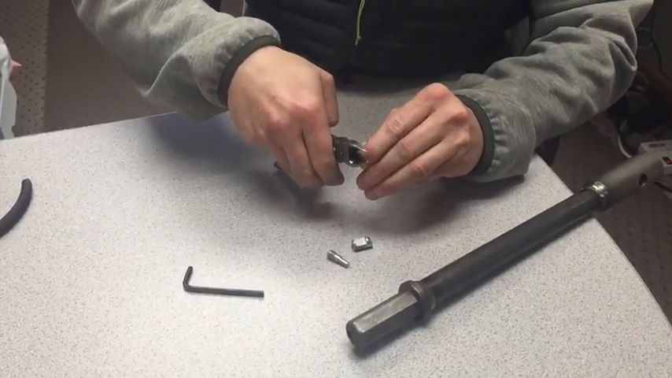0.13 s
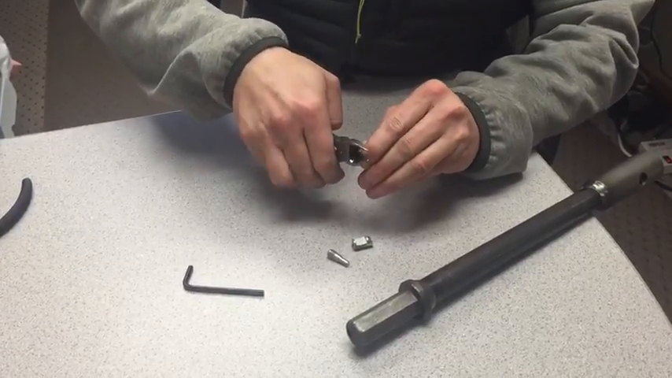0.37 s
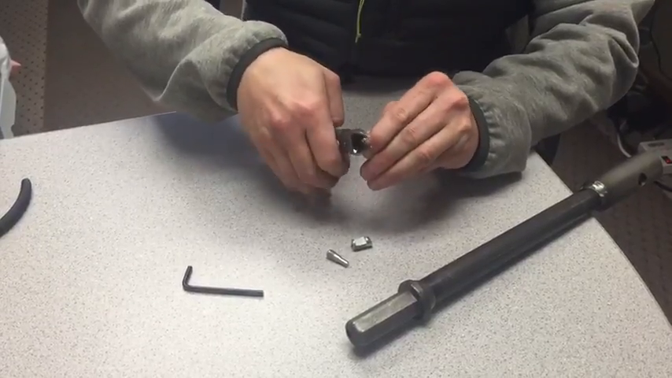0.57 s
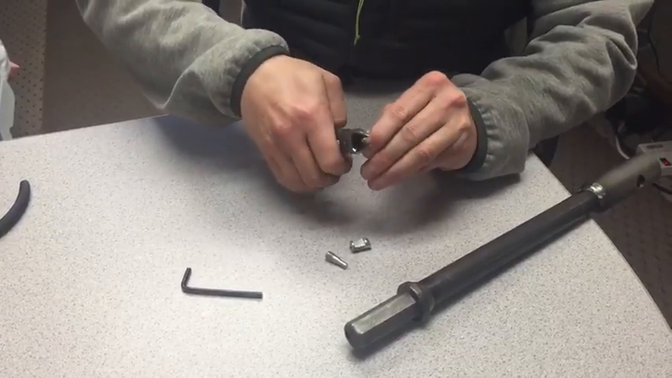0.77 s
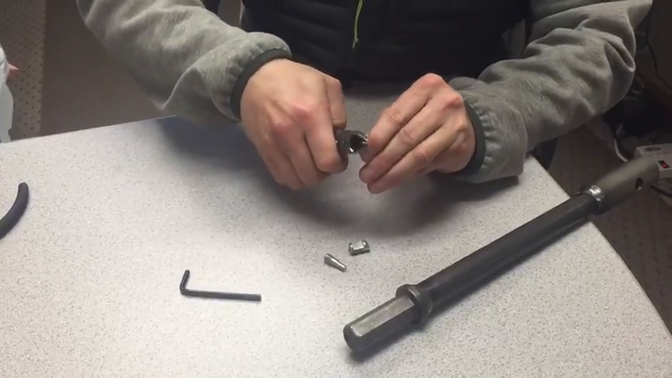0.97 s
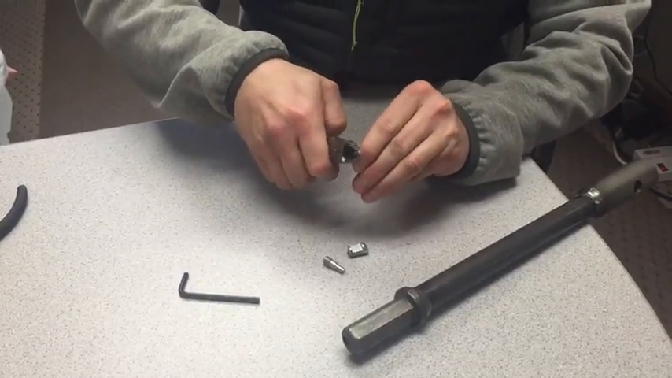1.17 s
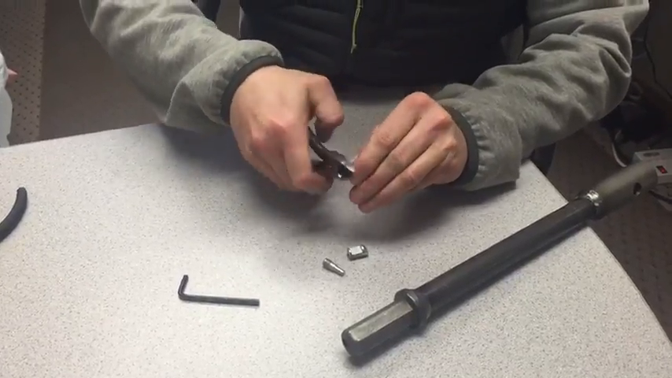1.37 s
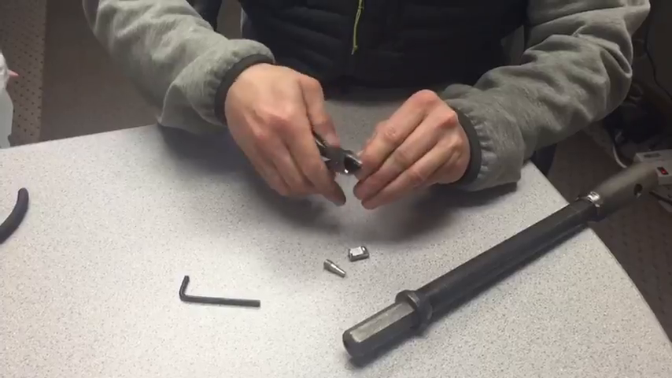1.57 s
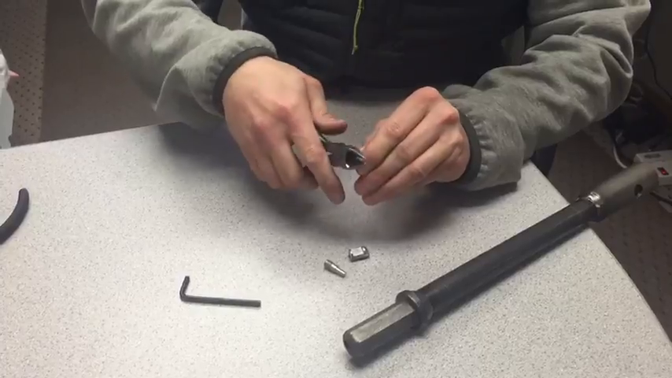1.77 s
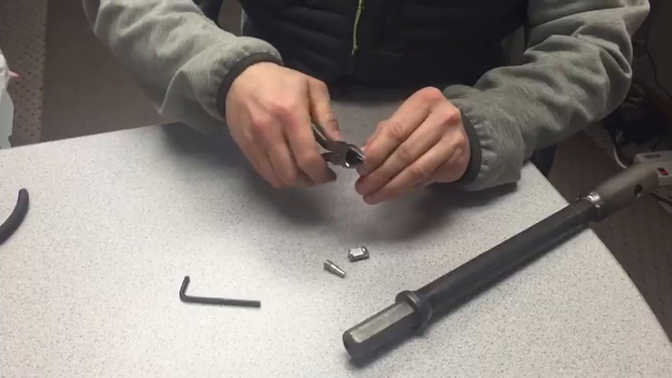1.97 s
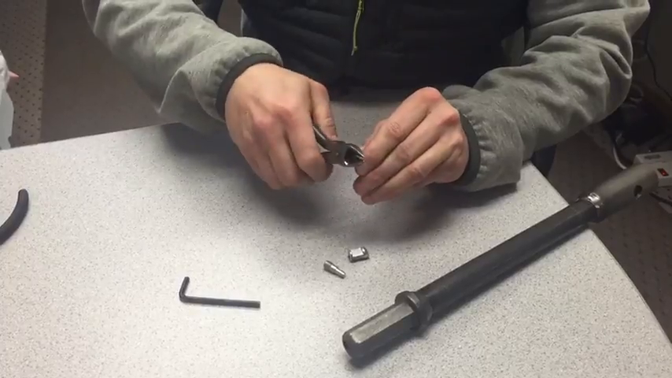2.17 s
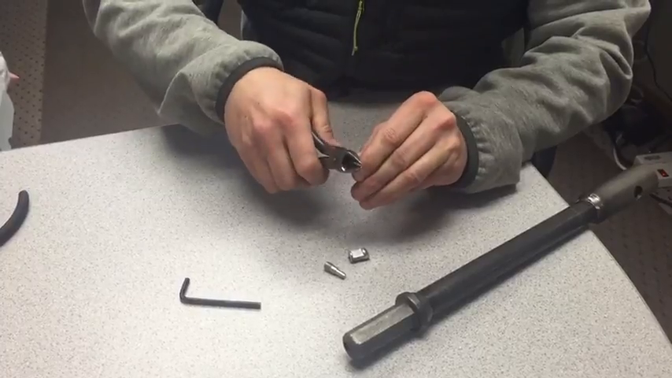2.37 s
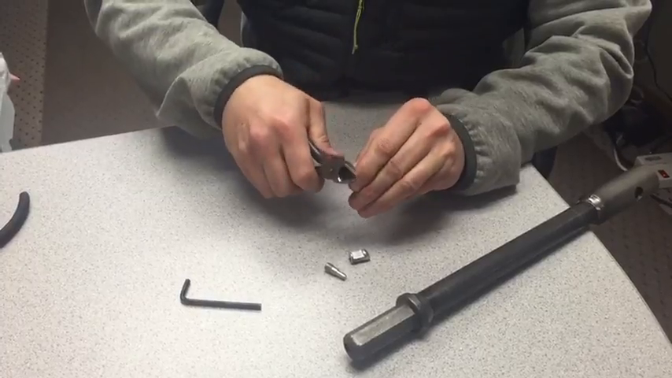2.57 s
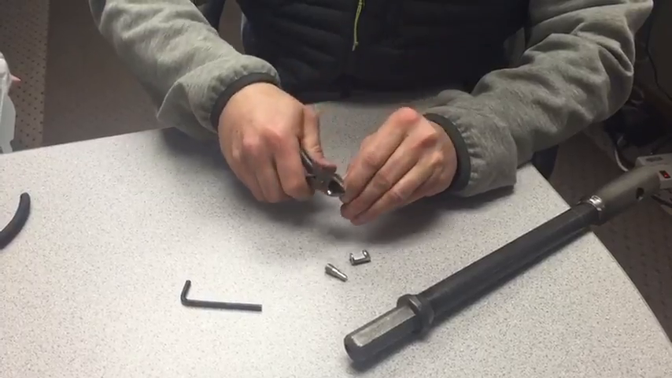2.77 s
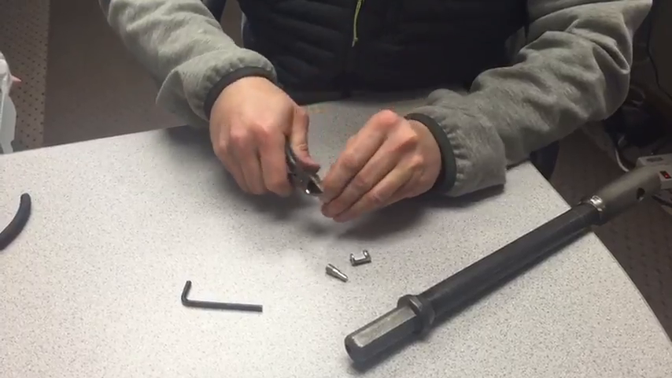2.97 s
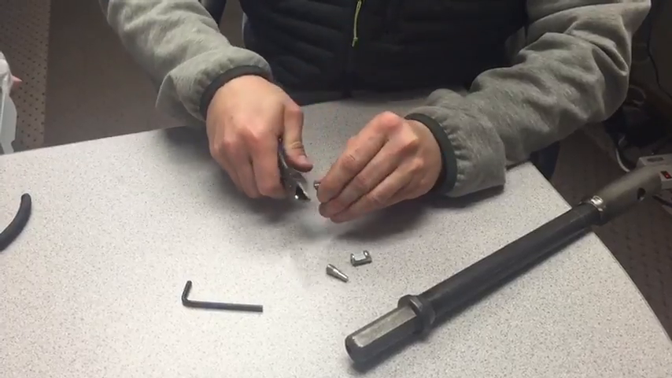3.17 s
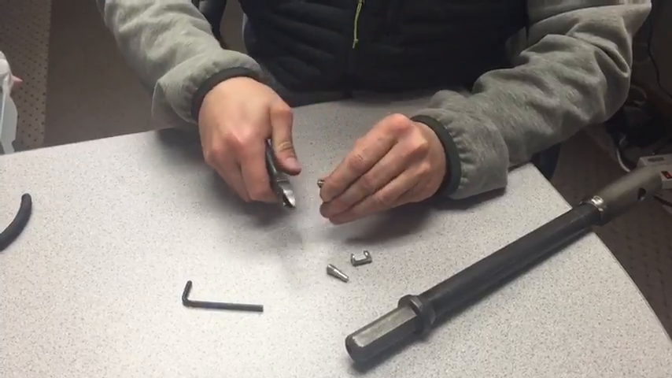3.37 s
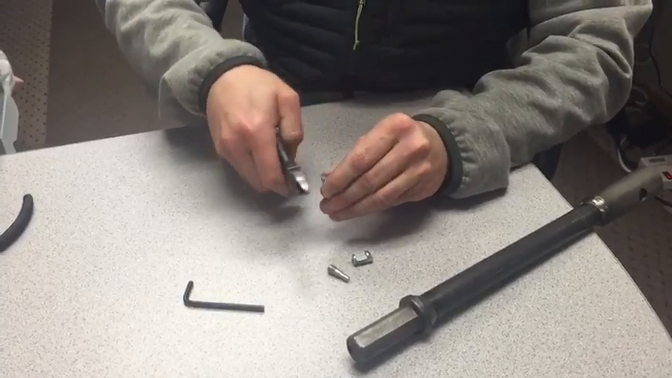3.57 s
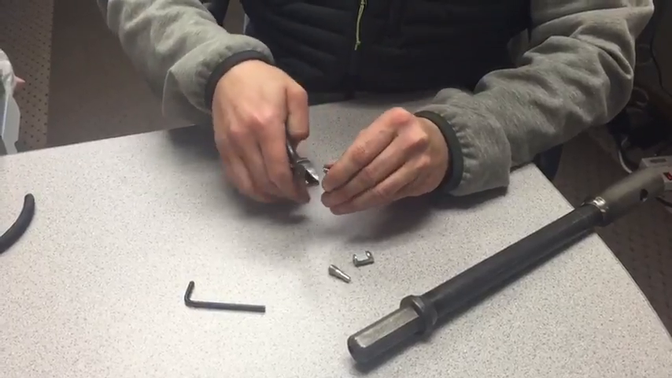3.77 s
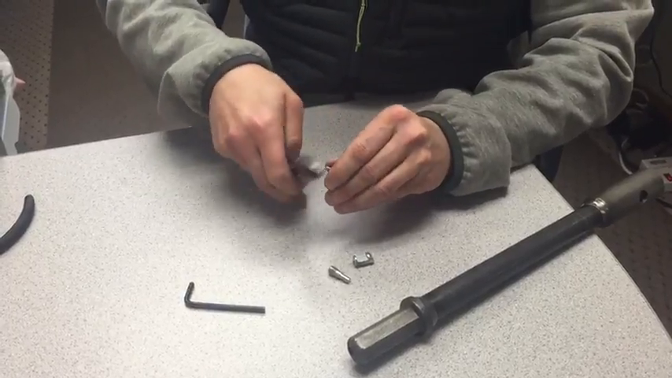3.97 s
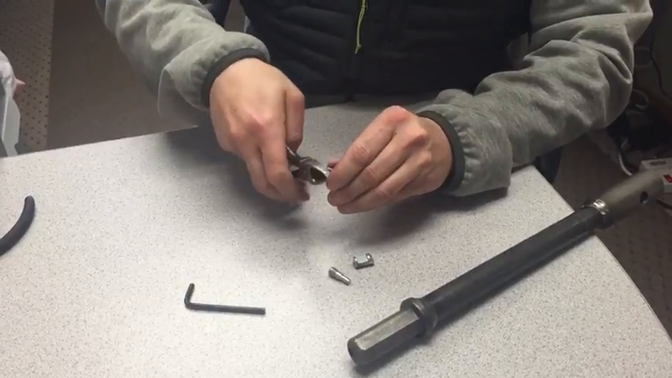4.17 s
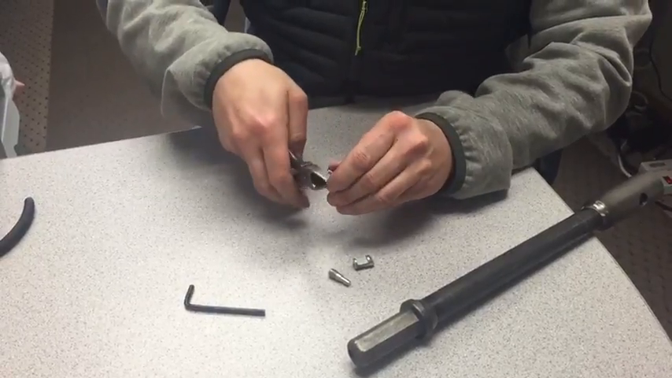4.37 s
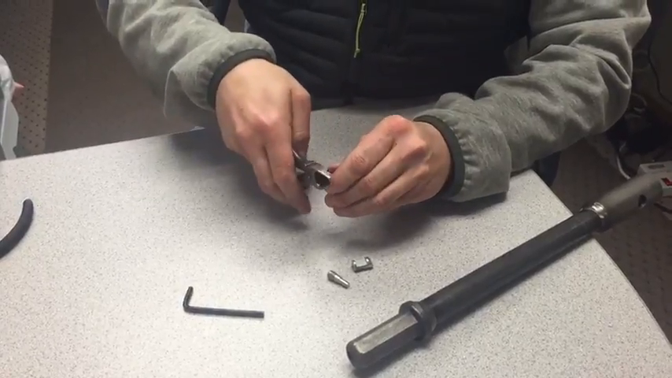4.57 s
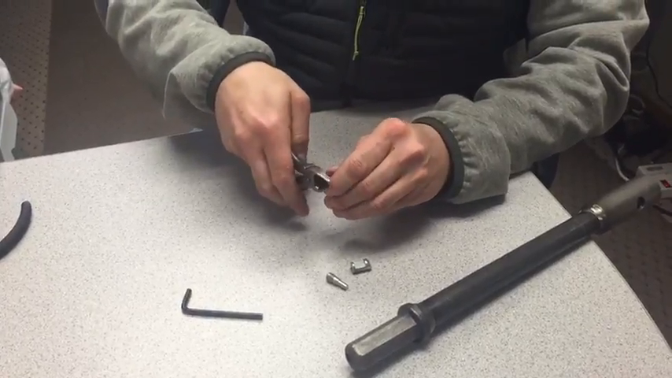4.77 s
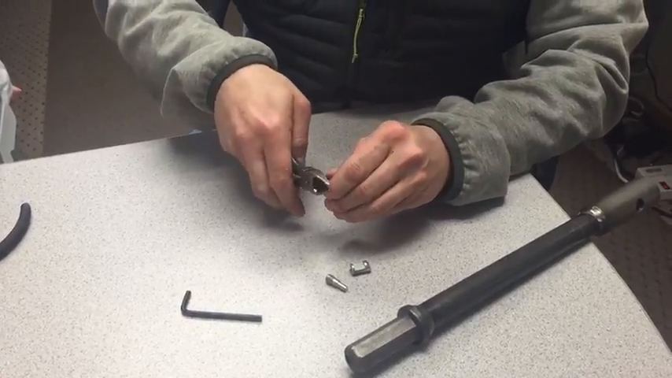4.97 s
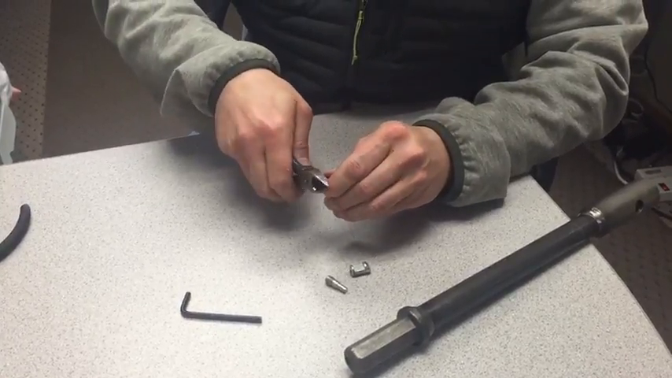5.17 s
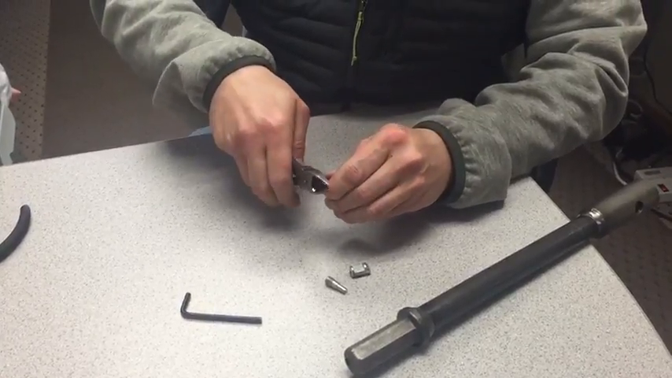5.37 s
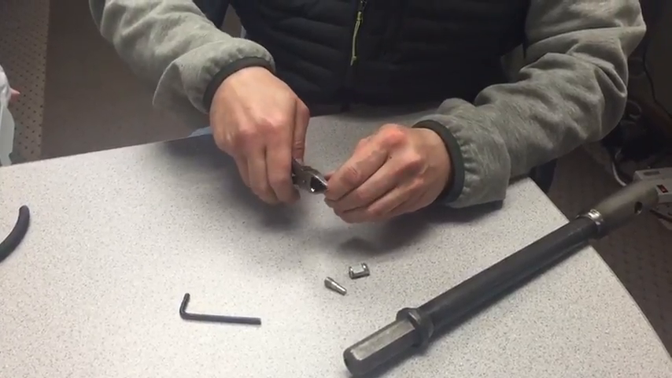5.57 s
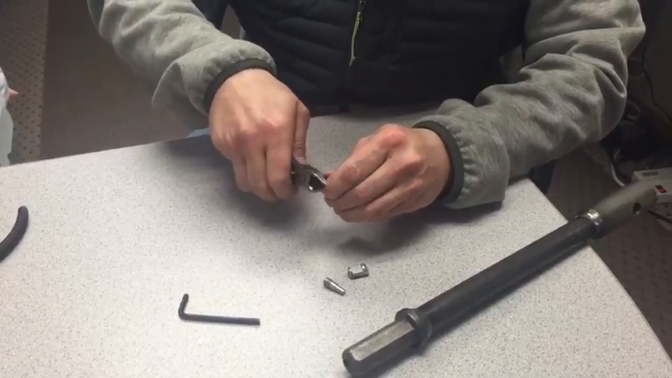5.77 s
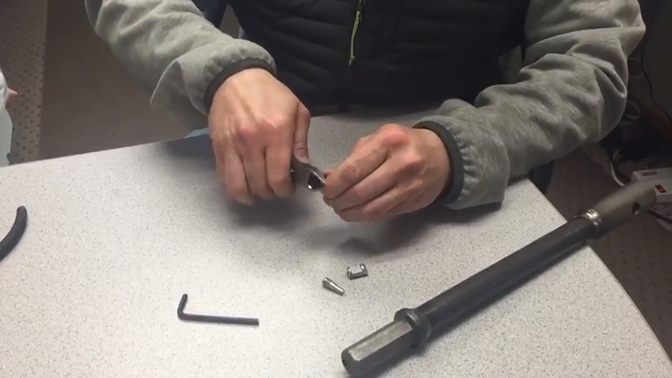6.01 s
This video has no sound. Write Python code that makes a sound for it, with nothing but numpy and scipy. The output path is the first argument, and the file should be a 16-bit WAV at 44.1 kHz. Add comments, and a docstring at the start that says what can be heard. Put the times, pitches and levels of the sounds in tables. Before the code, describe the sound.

Side cutters give a short, muted clack in the hand, and fingers rub briefly on the handles. After a pause, the jaws bite through a small steel spring with one loud, sharp snap, and the cut end lands faintly farther off. A tiny scrape, light metal ticks and a dry knock follow as the jaws touch the spring again. Heard close up at a table in a small, quietly humming room.

```python
"""A small, quietly humming room, where side cutters snip a small steel spring over a table.
The cutters clack as the hand takes a new grip, and fingers rub the handles. The jaws bite through
with one sharp snap that rings the steel and jolts the hands; the cut end flies off and lands far away.
As the cutters are set again, a jaw scrapes over the coils, then ticks and knocks on the spring."""
import sys
import numpy as np
from scipy import signal
from scipy.fft import rfft, irfft, next_fast_len
from scipy.io import wavfile
from scipy.ndimage import map_coordinates

SR = 44100
rng = np.random.default_rng(int(sys.argv[2]) if len(sys.argv) > 2 else 0)


def unload_wav(signal):
    """Save mono or channel-first audio to the path in sys.argv[1] as 16-bit WAV at rate SR, clipped to [-1, 1]."""
    wavfile.write(
        sys.argv[1],
        SR,
        np.round(np.clip(np.atleast_2d(signal).T, -1, 1) * 32767).astype(np.int16),
    )


N = 266408

# how long the room rings: frequency_hz, t60_s
ROOM_DECAY = [(100, 0.11), (600, 0.36), (2500, 0.23), (5000, 0.18), (9000, 0.21), (15000, 0.13)]
# bed of rumble and hiss: frequency_hz, density_db
AIR_COLOUR = [(13, -34.5), (22, -13), (53, -1.5), (95, -1.5), (118, -10.5), (179, -1.5), (205, -5.5),
              (223, -18), (294, -19.5), (356, -22.5), (387, -12.5), (420, -26.5), (482, -26.5),
              (2200, -34.5), (16000, -47.5)]
# hum of a distant motor: shaft_multiple, rms_db
MOTOR_HARMONICS = [(1, -66), (4, -68.5), (6, -83), (8, -80.5), (10, -85.5)]
# two more low tones in the room: pitch_hz, rms_db
DRONE_TONES = [(86.1, -71.5), (167, -66.5)]

# the cutters clack open: start_s, level_db
CLACK_HITS = [(0.5803, -26.5)]
# ring of the cutters, choked by the grip: pitch_hz, level_db, t60_s
GRIPPED_MODES = [(626, -10, 0.082), (723, -3, 0.033), (1060, -24, 0.044), (1760, -16, 0.029),
                 (2070, -6, 0.04), (2660, 5, 0.014), (2890, -2, 0.0064), (4280, -3, 0.012),
                 (5000, -8.5, 0.0095)]
# midrange attack of the clack: frequency_hz, density_db
CLACK_COLOUR = [(130, -4), (300, -5), (450, -9.5), (680, -1), (1050, 1), (1450, -15), (2100, -1.5),
                (2900, 1.5), (3700, -13.5), (4700, -17), (6200, -13.5), (8000, -22), (11000, -26),
                (16000, -46)]

# fingers slide on the handles: peak_s, level_db, width_s
RUB_STROKES = [(0.673, -49.5, 0.011), (0.749, -65.5, 0.017), (1.548, -73.5, 0.021), (4.215, -78, 0.12)]
# their soft friction: frequency_hz, density_db
RUB_COLOUR = [(200, -16), (470, -2.5), (640, 4.5), (850, 2), (1450, -20.5), (2150, -2), (2700, -11.5),
              (3800, -17), (4600, -17), (6000, -28), (16000, -50)]

# spring and jaw tips touch: start_s, level_db, ring_db, rebound_loss_db
TICK_HITS = [(2.929, -52.5, -8.5, 3), (4.0015, -39.5, 1, 6), (4.322, -65.5, -14, 14),
             (5.2228, -51.5, 4, 16)]
# thin ring of the tips: pitch_hz, level_db, t60_s
TIP_MODES = [(1470, -21.5, 0.018), (4138, -14, .022), (5360, -7.5, 0.02), (6370, -15, .016),
             (8807, -2, 0.021), (9310, -3, 0.015), (13194, -17, .012)]
# bright attack of a tick: frequency_hz, density_db
TICK_COLOUR = [(300, -27.5), (1500, -8.5), (3000, -13), (4500, -4), (9000, 2.5), (10500, -4), (13000, -2.5),
               (16000, -14)]

# the wire breaks in two quick cracks: start_s, level_db
SNAP_HITS = [(2.9519, -8), (2.9527, -6.5)]
# crack of the fracture: frequency_hz, density_db
CRACK_COLOUR = [(100, -15), (500, -12.5), (1050, -18.5), (1400, -5), (1950, -3), (3000, -6), (3700, -5.5),
                (4500, 3), (5100, -3.5), (6800, -3.5), (8400, 3.5), (9500, 1.5), (10200, -8), (11200, -1.5),
                (14000, -1), (16000, -11)]
# cutters and spring, struck hard: pitch_hz, level_db, t60_s
STEEL_MODES = [(1679, -23, .14), (1820, -21, 0.17), (1920, -15.5, 0.17), (2006, -23.5, .14),
               (2155, -26.5, .12), (2550, -27.5, 0.073), (4430, -20.5, .04), (4560, -22.5, 0.06),
               (7340, -17.5, .014), (8100, -11, 0.013), (8800, -12, .016), (9300, -15, .025)]
# thump through hands and table: pitch_hz, level_db, t60_s
JOLT_MODES = [(55, -9.5, 0.048), (93, -9, 0.034), (170.6, -3, 0.02), (234, -2, 0.0097), (375, -6.5, 0.02),
              (547.3, -4, .02), (717, -13.5, 0.025)]

# the cut end lands and bounces: start_s, level_db
CUT_END_HITS = [(3.0817, -34), (3.089, -43.5)]
# its small, hard click: frequency_hz, density_db
CUT_END_COLOUR = [(200, -35), (700, -18), (1200, -4.5), (2500, 4.5), (3500, -1), (9000, -5.5),
                  (10500, -8.5), (16000, -7.5)]

# rasp of a jaw on the coils: frequency_hz, density_db
COIL_COLOUR = [(500, -16), (2500, -18.5), (4200, -3.5), (5500, -9), (7200, 4.5), (9000, -14), (12000, -7),
               (16000, -20)]

# the jaws knock on the held spring: start_s, level_db, ring_db
KNOCK_HITS = [(4.076, -48.5, -19), (4.264, -56, -14), (4.5399, -22, -4.5)]
# dull attack of a knock: frequency_hz, density_db
KNOCK_COLOUR = [(150, -9), (330, 5.5), (480, -1), (650, -1), (1100, 0.5), (1500, -19), (1950, -19),
                (2450, -1.5), (3100, -7.5), (4000, -3.5), (5000, -5.5), (6000, -19), (10000, -31),
                (16000, -37)]
# table and jaws ringing under it: pitch_hz, level_db, t60_s
TABLE_MODES = [(342, -14.5, 0.14), (523, -20.5, 0.08), (615, -22.5, 0.097), (1800, -4, 0.012),
               (2086, 0.5, 0.012), (2400, 1, 0.0108)]


def amp(db):
    """Decibels to gain."""
    return 10 ** (np.asarray(db) / 20)


def unit(x):
    """Scale to rms 1."""
    return x / np.sqrt(np.mean(x ** 2) + 1e-20)


def along(points, hz):
    """Read a curve of (frequency_hz, value) points on a log frequency axis."""
    frequencies, values = np.transpose(points)
    return np.interp(np.log(hz + 1), np.log(frequencies), values)


def wobble(rate_hz):
    """A smooth random drift through rate_hz knots a second."""
    knots = rng.standard_normal(int(N * rate_hz / SR) + 4)
    return map_coordinates(knots, [np.arange(N) * rate_hz / SR])


def filtered(x, response):
    """Zero-phase EQ; response gives the gain at each frequency."""
    size = next_fast_len(N + SR // 2)
    return irfft(rfft(x, size) * response(np.fft.rfftfreq(size, 1 / SR)), size)[:N]


def low_cut(x, hz, order):
    """Roll off the lows below hz."""
    return signal.sosfilt(signal.butter(order, hz, "high", fs=SR, output="sos"), x)


def age():
    """Time since a blow, half a second of it."""
    return np.arange(SR // 2) / SR


def placed(start_s, x):
    """A silent track with x laid in at start_s."""
    track = np.zeros(N)
    part = track[round(start_s * SR):][:len(x)]
    part += x[:len(part)]
    return track


def ring(modes, scatter_db, polarity=-1):
    """Damped modes, at new strengths for each blow; neighbours alternate in sign unless polarity is 1."""
    t = age()
    return sum(polarity ** k * amp(db + scatter_db * rng.normal() - 60 * t / t60_s)
               * np.sin(2 * np.pi * hz * t) for k, (hz, db, t60_s) in enumerate(modes))


def burst(colour, t60_s, clean=0):
    """A coloured contact: one click with the clean share of the energy, and a dying spurt of grit."""
    t = age()
    fade = amp(-60 * t / t60_s)
    grit = fade * rng.standard_normal(len(t)) * (t > 0)
    spurt = np.sqrt(1 - clean) * grit / np.linalg.norm(grit) + np.sqrt(clean) * (t == 0)
    gains = unit(amp(along(colour, np.fft.rfftfreq(SR, 1 / SR))))
    # minimum-phase EQ keeps the attack sharp: nothing sounds before the hit
    cepstrum = irfft(np.log(gains), SR)
    cepstrum[1:SR // 2] *= 2
    cepstrum[SR // 2:] = 0
    return np.linalg.norm(fade) * irfft(rfft(spurt, SR) * np.exp(rfft(cepstrum)), SR)[:len(t)]


def in_room(x, near_db, tail_db, wall_db=-12, near_t60_s=0.036, wall_s=0.008, build_s=0.0057):
    """Direct sound, near scatter from table and arms, a slap off one wall, and the diffuse tail."""
    t = age()
    near = rng.standard_normal(len(t)) * amp(-60 * t / near_t60_s) * (t > 0.001)
    near = low_cut(near, hz=1200, order=1)  # small things scatter only short waves
    hz, frame_s, noise = signal.stft(rng.standard_normal(len(t)), SR, nperseg=256)
    decay = amp(-60 * frame_s / along(ROOM_DECAY, hz)[:, None])
    tail = signal.istft(noise * decay, SR, nperseg=256)[1][:len(t)]
    tail *= 1 - np.exp(-t / build_s)
    response = amp(near_db) * near / np.linalg.norm(near) + amp(tail_db) * tail / np.linalg.norm(tail)
    response[0] += 1
    response[round(wall_s * SR)] += amp(wall_db)
    return signal.fftconvolve(x, response)[:N]


def room_tone(air_db=-59, low_cut_hz=43.75, shaft_hz=48.66, waver_db=2.5):
    """A bed of low rumble and soft hiss, with a wavering motor hum and drone."""
    t = np.arange(N) / SR
    air = filtered(rng.standard_normal(N),
                   lambda hz: amp(along(AIR_COLOUR, hz)) * hz ** 3 / np.hypot(hz ** 3, low_cut_hz ** 3))
    tones = [(multiple * shaft_hz, db) for multiple, db in MOTOR_HARMONICS] + DRONE_TONES
    hum = np.zeros(N)
    for hz, db in tones:
        peak = np.sqrt(2) * amp(db + waver_db * wobble(rate_hz=3.9))
        hum += peak * np.sin(2 * np.pi * hz * t + wobble(rate_hz=6.4))
    return amp(air_db) * unit(air) + hum


def grip_clack(attack_db=2):
    """The cutters clack open; the hand damps them to a short, low ring."""
    track = np.zeros(N)
    for start_s, db in CLACK_HITS:
        body = ring(GRIPPED_MODES, scatter_db=1.5)
        attack = amp(attack_db) * burst(CLACK_COLOUR, t60_s=0.012, clean=0.68)
        track += placed(start_s, amp(db) * (body + attack))
    return in_room(track, near_db=-8.5, tail_db=-13, wall_db=-29)


def finger_rubs(roughness_db=2.1):
    """Fingers slide on the handles: soft swells of uneven friction, coloured by the cutters."""
    t = np.arange(N) / SR
    swells = sum(amp(db) * np.exp(-0.5 * ((t - peak_s) / width_s) ** 2)
                 for peak_s, db, width_s in RUB_STROKES)
    friction = unit(filtered(rng.standard_normal(N), lambda hz: amp(along(RUB_COLOUR, hz))))
    grain = amp(roughness_db * wobble(rate_hz=150))
    return in_room(swells * friction * grain, near_db=-8, tail_db=-9)


def tip_ticks(contacts=3, flight_s=0.011, flight_shrink=0.6):
    """Light touches ring only the small, high modes; each rebounds ever sooner and weaker."""
    track = np.zeros(N)
    for start_s, db, ring_db, loss_db in TICK_HITS:
        for k in range(contacts):
            tick = burst(TICK_COLOUR, t60_s=0.012) + amp(ring_db) * ring(TIP_MODES, scatter_db=2)
            track += placed(start_s, amp(db - loss_db * k) * tick)
            start_s += flight_s * flight_shrink ** k
    return in_room(track, near_db=-9.5, tail_db=-12)


def wire_snap(steel_db=-9, jolt_db=-15.5):
    """The fracture cracks and rings the steel; the freed grip jolts hands and table, adding weight."""
    break_s = SNAP_HITS[0][0]
    cracks = [placed(start_s, amp(db) * burst(CRACK_COLOUR, t60_s=0.009, clean=0.25))
              for start_s, db in SNAP_HITS]
    ringing = placed(break_s, amp(steel_db) * ring(STEEL_MODES, scatter_db=0.5))
    # each part radiates its own way into the room
    steel = sum(in_room(part, near_db=-6, tail_db=-9.5, wall_db=-11.5) for part in cracks + [ringing])
    jolt = placed(break_s, amp(jolt_db) * ring(JOLT_MODES, scatter_db=0.5, polarity=1))
    jolt = low_cut(jolt, hz=55, order=5)  # keeps the thump tight, without deep rumble
    return steel + in_room(jolt, near_db=-17, tail_db=-23, wall_db=-21.5)


def cut_end_landing():
    """The cut end lands far off, more room than direct sound; each bounce is in a new spot."""
    track = np.zeros(N)
    for start_s, db in CUT_END_HITS:
        click = amp(db) * burst(CUT_END_COLOUR, t60_s=0.011, clean=0.8)
        track += in_room(placed(start_s, click), near_db=-8, tail_db=6)
    return track


def coil_scrape(start_s=3.806, first_db=-53, slips=5, slips_per_s=97, loss_db=0.5):
    """A quick zip: the jaw slips from coil to coil at an even pace, each slip a little weaker."""
    track = np.zeros(N)
    for k in range(slips):
        slip = amp(first_db - loss_db * k) * burst(COIL_COLOUR, t60_s=0.026)
        track += placed(start_s + k / slips_per_s, slip)
    return in_room(track, near_db=-19, tail_db=-5)


def jaw_knocks():
    """Short, dry knocks on the held spring; the forearms pass a thud to the table."""
    track = np.zeros(N)
    for start_s, db, ring_db in KNOCK_HITS:
        attack = burst(KNOCK_COLOUR, t60_s=0.0039, clean=0.88)
        body = amp(ring_db) * ring(TABLE_MODES, scatter_db=1.5)
        track += placed(start_s, amp(db) * (attack + body))
    return in_room(track, near_db=-9, tail_db=-13)


def scene():
    """All layers in one mono mix, from the snap down to the bed."""
    mix = wire_snap() + grip_clack() + jaw_knocks() + finger_rubs() + tip_ticks() + coil_scrape()
    return (mix + cut_end_landing() + room_tone())[None]


def record(dry):
    """The microphone rounds off the highest peaks and cuts the treble steeply above top_hz."""
    ceiling, top_hz = 1.15, 15950
    rounded = dry[0] / (1 + np.abs(dry[0] / ceiling) ** 8) ** (1 / 8)
    return filtered(rounded, lambda hz: 1 / np.sqrt(1 + (hz / top_hz) ** 160))[None]


dry = scene()
out = record(dry)
unload_wav(out)
```